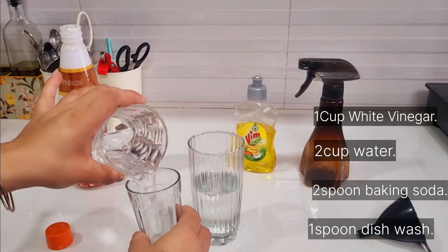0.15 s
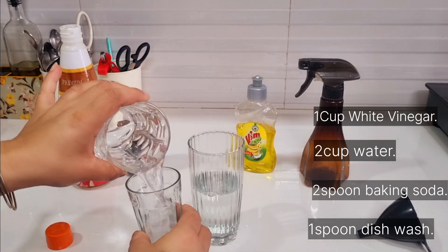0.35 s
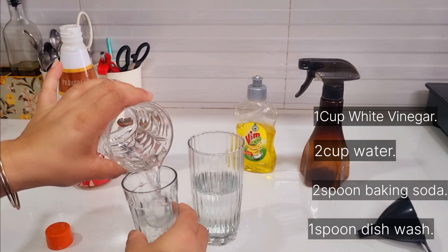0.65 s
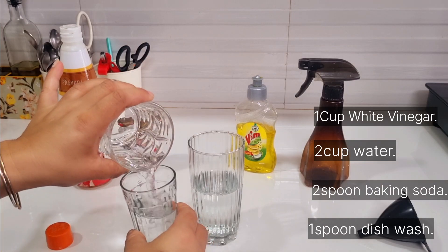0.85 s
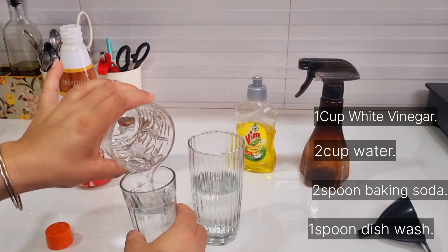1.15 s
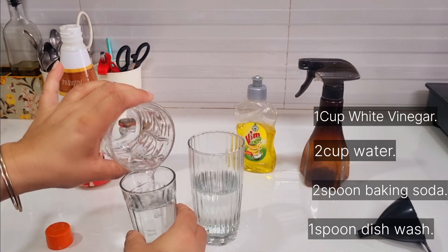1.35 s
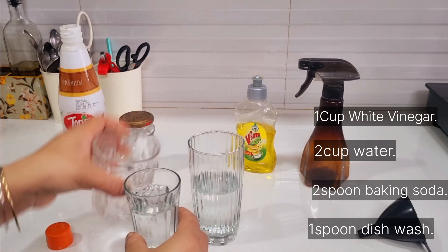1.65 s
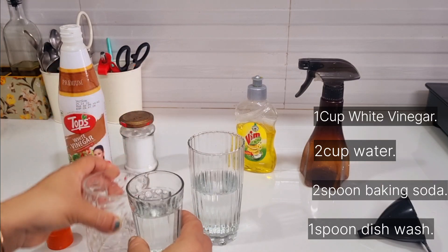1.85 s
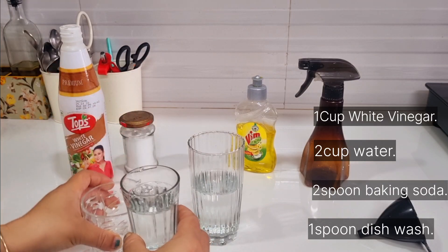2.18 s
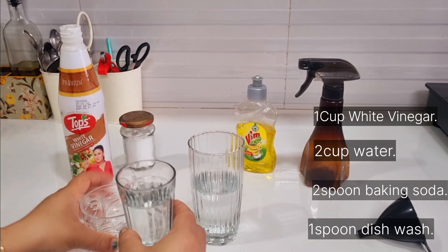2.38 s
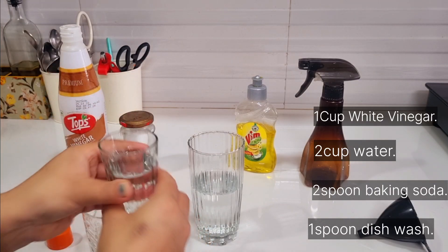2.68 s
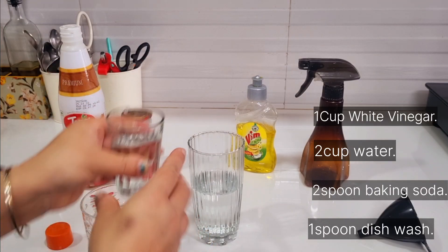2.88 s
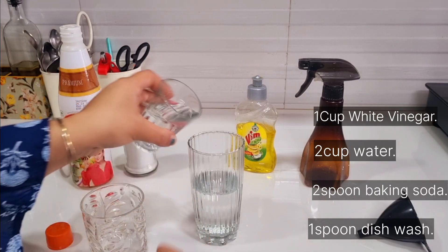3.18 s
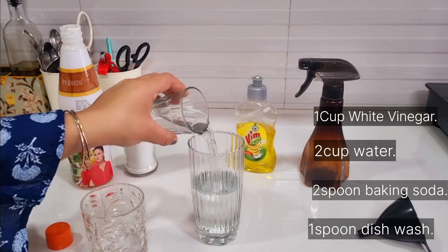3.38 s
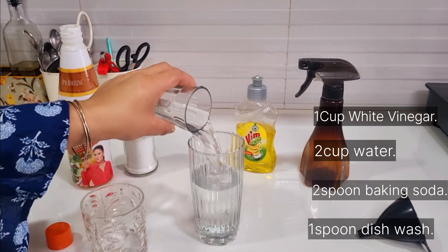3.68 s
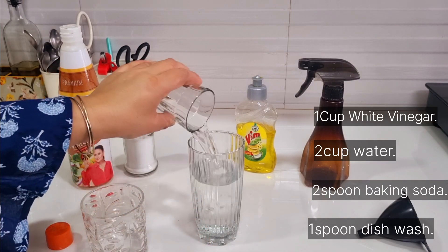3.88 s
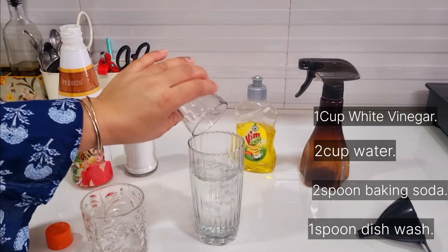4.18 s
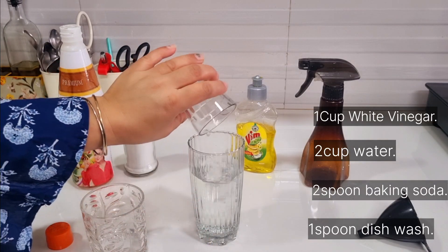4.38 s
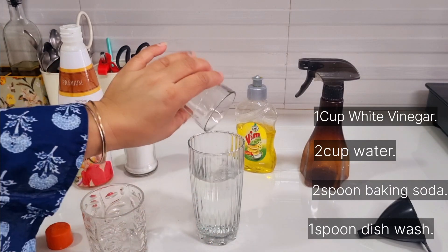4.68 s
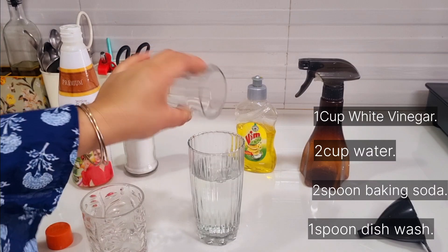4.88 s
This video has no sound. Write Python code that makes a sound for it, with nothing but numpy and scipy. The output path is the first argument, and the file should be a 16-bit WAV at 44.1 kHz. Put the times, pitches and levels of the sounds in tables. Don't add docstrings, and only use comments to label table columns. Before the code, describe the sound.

Close bubbly pouring between glasses with glassy ticks, a hard clink on a stone counter, faint bangle jingle, another pour and low fridge hum.

```python
import sys
import numpy as np
from scipy import signal
from scipy.fft import rfft, irfft, next_fast_len
from scipy.io import wavfile

SR = 44100
rng = np.random.default_rng(int(sys.argv[2]) if len(sys.argv) > 2 else 0)


def log_audio(samples):
    frames = np.atleast_2d(samples).T
    limited = np.clip(frames, -1, 1)
    pcm = np.round(limited * 32767).astype(np.int16)
    wavfile.write(sys.argv[1], SR, pcm)


def gain_from_db(level_db):
    decades = np.asarray(level_db, float) / 20
    return 10 ** decades


N = 222374


def rms_one(x):
    return x / np.sqrt(np.mean(x ** 2) + 1e-20)


def at_hz(points, hz):
    table = np.array(points)
    return np.interp(np.log(np.maximum(hz, 1)), np.log(table[:, 0]), table[:, 1])


def drift(rate):
    r = np.exp(-80 * np.pi * rate / SR)
    white = rng.standard_normal(N // 40 + 2002)
    slow = signal.lfilter([1], [1, -2 * r, r * r], white)[2000:]
    return np.interp(np.arange(N) / 40, np.arange(len(slow)), rms_one(slow))


def coloured(white, spectrum):
    size = next_fast_len(N)
    gain = gain_from_db(at_hz(spectrum, np.fft.rfftfreq(size, 1 / SR)))
    return rms_one(irfft(rfft(white, size) * gain, size)[..., :N])


def diffuse(length):
    # (frequency [Hz], correlation [-1..1])
    likeness = [(60, 0.95), (130, 0.92), (290, 0.89), (640, 0.15), (1410, -0.23), (3100, 0.01),
                (6820, -0.09), (15000, -0.18)]
    alike = np.clip(at_hz(likeness, np.fft.rfftfreq(length, 1 / SR)), -1, 1)
    mid, side = rfft(rng.standard_normal((2, length)))
    return (np.sqrt(1 + alike) * mid + np.sqrt(1 - alike) * side * [[1], [-1]]) / np.sqrt(2)


def room_noise():
    # (frequency [Hz], level [dB per Hz])
    noise_colour = [(25, -20), (50, -5), (72, -9.5), (95, 0.5), (135, -11), (245, -9),
                    (332, -6.5), (381, -12.5), (700, -20.5), (1060, -25), (2880, -29.5), (5760, -37.5),
             (8000, -35), (10300, -49)]
    # (frequency [Hz], left over right [dB])
    left_more = [(60, 2), (180, 4.5), (550, 2.5), (1650, 3), (4970, 1.5), (15000, -12.5)]
    size = next_fast_len(N)
    hz = np.fft.rfftfreq(size, 1 / SR)
    sides = gain_from_db(at_hz(left_more, hz) * np.array([[.5], [-.5]]))
    spectra = diffuse(size) * sides * gain_from_db(at_hz(noise_colour, hz))
    return gain_from_db(-49.5) * rms_one(irfft(spectra, size)[:, :N])


def fridge_hum():
    # (frequency [Hz], level [dB rms])
    lines = [(147.3, -50.5), (196.6, -55), (324.5, -58)]
    t, hum = np.arange(N) / SR, np.zeros(N)
    for hz, db in lines:
        level = gain_from_db(db + 1.03 * drift(3)) * np.sqrt(2)
        hum += level * np.sin(2 * np.pi * (hz * t + 0.022 * drift(1.5) + rng.random()))
    return hum


def rustle():
    # (time [s], peak [dB], half-width at 10 dB down [s])
    moves = [(.35, -55, 0.23), (1.5, -61.5, 0.6), (2.27, -53, -0.25), (2.75, -61.5, .5), (3.65, -62, .25),
             (4.05, -63, 0.6), (4.53, -51.5, 0.28), (4.95, -61, 0.7)]
    t = np.arange(N) / SR
    moves_db = np.max([db - 10 * ((t - s) / width) ** 2 for s, db, width in moves], axis=0)
    cloth = coloured(rng.standard_normal((2, N)), [(3000, -39), (8000, -11), (12000, 0.0), (15500, 1.2)])
    return gain_from_db(moves_db - 6.5) * cloth


def room_tail():
    # (frequency [Hz], t60 [s])
    kitchen_t60 = [(100, 1), (500, 0.33), (2000, 0.37), (5000, 0.5), (9000, 0.24), (16000, 0.13)]
    length = 2 ** 15
    age, hz = np.arange(length) / SR, np.fft.rfftfreq(length, 1 / SR)
    noise, tail = diffuse(length), 0
    for centre in 62.5 * 2 ** np.arange(9):
        share = np.clip(1 - np.abs(np.log2(np.maximum(hz, 62.5) / centre)), 0, 1)
        band = irfft(noise * share, length)
        tail = tail + band * gain_from_db(-60 * age / at_hz(kitchen_t60, centre))
    tail *= np.clip((age - .002) / 0.00089, 0, 1)
    return tail / np.sqrt(np.sum(tail ** 2) / 2)


def late_right(x, count):
    return np.stack([x[0], np.roll(x[1], count)])


def ring(clicks, hz, t60):
    r, w = gain_from_db(-60 / (t60 * SR)), 2 * np.pi * hz / SR
    return signal.lfilter([0, np.sin(w)], [1, -2 * r * np.cos(w), r * r], clicks + 1e-18)


def struck(blows, modes):
    out, at = np.zeros(N), [round(s * SR) for s, db in blows]
    later = np.arange(len(at)) > 0
    for k, (hz, level_db, t60) in enumerate(modes):
        clicks = np.zeros(N)
        uneven_db = 3 * rng.standard_normal(len(at)) * later
        clicks[at] = gain_from_db(np.array(blows)[:, 1] + level_db + uneven_db)
        out += ring(clicks, hz, t60) * (-1) ** k
    return np.tile(out, (2, 1))


def counter_thud():
    # (frequency [Hz], level [dB], t60 [s])
    blow = [(2.205, -26)]
    slab = [(102, -18, 0.2), (124, -7, 0.4049), (218, -7, 0.14), (382, -12, 0.084)]
    return struck(blow, slab)


def full_glass_nudge():
    # (frequency [Hz], level [dB], t60 [s])
    touches = [
        (1.376, -60.5),
        (1.395, -53.5),
    ]
    full_glass = [(2420, -6, .12), (3020, -3, 0.4), (5370, -3.5, 0.073)]
    return struck(touches, full_glass)


def bangles():
    # (frequency [Hz], level [dB], t60 [s])
    knocks = [
        (2.515, -57),
        (2.5235, -43),
        (2.546, -48),
        (2.866, -49),
    ]
    metal = [(5000, -5.5, 0.014), (5580, -6, 0.016), (7650, -2, 0.025), (8350, 2, 0.043),
             (9080, -1.5, 0.045), (11100, -8, 0.013), (12070, 3, 0.05), (13080, 2, 0.066),
             (15100, -5.5, .03)]
    return struck(knocks, metal)


def rim_tick():
    # (frequency [Hz], level [dB], t60 [s])
    tick = [(.2098, -31.5)]
    rim_modes = [(3370, -14, 0.0464), (4450, -16, 0.036), (5280, 5.5, 0.025), (5875, 6, 0.017),
                 (7750, -8, .03), (9930, -8, 0.095), (10600, -6, .03), (13140, -10, 0.029),
                 (15100, 1.5, 0.024)]
    return struck(tick, rim_modes)


def glass_knocks():
    # (time [s], peak [dB])
    bounces = [
        (2.1823, -13.5),
        (2.2005, -24.5),
        (2.215, -29),
        (2.236, -36),
    ]
    tap = [(.664, -31)]
    # (frequency [Hz], level [dB], t60 [s])
    tumbler = [(575, -29, 0.017), (1006, 2, 0.03), (1120, 3.5, 0.012), (1450, 0, 0.007972),
               (1650, -6.5, 0.015), (1980, -5, 0.011), (2213, -1, .04), (2290, 0.5, 0.022),
               (2350, -13.5, 0.22), (2490, -5, 0.013), (3499, -3, 0.0047), (4550, -3, 0.0049),
               (5510, -5, 0.0062), (8000, -11.5, 0.0011)]
    filling_glass = [(522, -4, 0.023), (2137, -2, 0.068), (3213, -7, 0.036), (5000, -4, 0.047),
                     (5400, -5, 0.0217), (4200, -21, 0.016), (7400, -9, 0.025), (9140, -11.5, 0.047),
                     (12800, -26, .04)]
    return struck(bounces, tumbler) + struck(tap, filling_glass)


def add(out, s, piece, pan_db, echo_db):
    at, pan_db = round(s * SR), np.clip(pan_db, -8, 8)
    gains = gain_from_db(np.array([[pan_db / 2], [-pan_db / 2], [echo_db]]))
    out[:, at:at + len(piece)] += piece[:N - at] * gains


def ticks(rows, pan_db, echo_db):
    out, age = np.zeros((3, N)), np.arange(400) / SR
    for (s, peak_db, hz, octaves), white in zip(rows, rng.standard_normal((len(rows), 400))):
        edges = np.clip(hz * 2 ** (np.array([-.5, .5]) * max(octaves, .3)), 100, .45 * SR)
        band = signal.butter(2, edges, "band", fs=SR, output="sos")
        piece = signal.sosfilt(band, white * np.exp(-age / 0.0014))
        add(out, s, gain_from_db(peak_db + 2.5) * piece / np.abs(piece).max(), pan_db, echo_db)
    return out


def drops_and_fingers():
    # (time [s], peak [dB], centre [Hz], width [octaves])
    tick_rows = [(.1252, -38, 7000, 2.3), (.2086, -28.5, 7000, 2.5), (.4985, -36, 9000, 2.5),
                 (.5935, -47, 8900, 0.99), (.6628, -34, 2510, 2.1), (.7044, -40, 9000, 2),
                 (.758, -44, 9000, 1.5), (.8777, -53, 8000, 1.6), (1.4752, -48, 686.4, 1),
                 (1.4953, -46.5, 800, 5), (1.5209, -55, 5000, 1.2), (1.6203, -49, 6950, 2.234),
                 (2.867, -48, 11100, 1.17), (3.4323, -51, 5000, 4.195)]
    close_rows = [(.35, -35, 895, 1.5), (.441, -38.5, 1180, 1.4), (.548, -45.5, 1500, 1.1),
                  (.663, -32.5, 780, 2.1), (4.036, -46, 1870, 1.3), (3.478, -40, 3370, 0.24),
                  (4.162, -37, 2180, 3.3), (4.56, -47.5, 3640, 0.27), (4.9177, -46, 11000, 2.137),
                  (4.94, -31, 13300, .71), (4.9638, -42.5, 3440, 2.3)]
    crack = [(2.1823, -40, 11100, 1.4)]
    out = ticks(tick_rows, pan_db=1.5, echo_db=3.5)
    out += ticks(close_rows, pan_db=14, echo_db=-6)
    return out + ticks(crack, pan_db=0, echo_db=15.5)


def with_brood(rows, count=3):
    spread_s, level_db, spread_octaves = .03, -9, 0.157
    brood = []
    for (s, db, hz), kin in zip(rows, rng.random((len(rows), count, 3))):
        for a, b, c in kin:
            if s + spread_s < N / SR:
                pitch = hz * 2 ** (spread_octaves * (2 * c - 1))
                brood.append((s + spread_s * a, db + level_db - 6 * b, pitch))
    return rows + brood


def bubbles(rows, echo_db, rise=0.034):
    out = np.zeros((3, N))
    for (s, peak_db, hz), place in zip(rows, rng.standard_normal(len(rows))):
        t60 = 0.048 * (hz / 1000) ** -0.46
        age = np.arange(round(t60 * SR)) / SR / t60
        phase = 2 * np.pi * hz * t60 * (age + rise * (2 * age ** 2 - age))
        swell = np.sin(np.pi / 2 * np.minimum(age * t60 * hz / 3.5, 1)) ** 2
        piece = gain_from_db(peak_db - 60 * age) * swell * np.sin(phase)
        add(out, s - 1.5 / hz, piece, 7.5 * place, echo_db)
    return out


def pour_bubbles():
    # (time [s], peak [dB], pitch [Hz])
    glugs = [(.314, -41, 950), (.323, -35.5, 1463), (.344, -33.5, 940), (.35, -30, 698),
             (.361, -44, 770), (.371, -36, 956), (.4, -33.5, 1530), (.416, -33, 947),
             (.441, -34.5, 945), (.448, -54, 900), (.462, -33.5, 1410), (.499, -41, 1515),
             (.526, -35, 1556), (.527, -42.5, 995), (.549, -42, 1450), (.577, -56, 1400),
             (.691, -41, 2100), (.703, -38, 1650), (.726, -38, 2100), (.747, -36.5, 1825),
             (.767, -52, 1810), (.814, -48, 2220), (.858, -46, 1840), (.896, -45.5, 1805),
             (1.476, -44, 428), (1.495, -50, 472),
             (3.434, -32.5, 480), (3.444, -43, 1160), (3.459, -41, 450), (3.472, -41.5, 1283),
                   (3.531, -32.5, 1180), (3.5557, -39.5, 1186), (3.699, -48, 1470), (3.713, -48, 1390),
                   (3.7888, -48, 1050), (3.833, -48, 1720), (3.9865, -41.5, 1670), (4.0374, -42.5, 1950),
                   (4.047, -42, 1656), (4.061, -46, 1650), (4.0744, -45, 1440), (4.161, -46.5, 400),
                   (4.1615, -41.5, 764), (4.1619, -45, 2810), (4.1633, -54, 4360), (4.962, -43, 402.6),
                   (5.027, -54, 2180),
             (0.3346, -41.5, 2570), (.3544, -42, 2440), (.4044, -45, 2190), (.5482, -42, 2090),
                (.564, -46, 2340), (3.744, -50, 4450), (3.765, -57, 5170), (3.54, -37, 1120),
                (3.6, -61, 1140)]
    pings = [(.1285, -37, 3570), (.1494, -50, 3770), (0.3462, -36.5, 5520), (.3694, -43, 3610),
             (.8799, -46, 4510), (0.8954, -49.5, 4050), (1.1749, -50.5, 7250), (1.289, -50.5, 13000),
             (3.4444, -49, 6160), (3.4666, -38.5, 8800), (1.6197, -60, 11000), (3.4814, -46, 5171),
             (3.4994, -45, 3490), (3.515, -38, 13400), (4.012, -52, 14500), (3.5531, -42, 4680),
             (3.608, -48.5, 3250), (3.6248, -50.5, 6280), (3.7363, -49.5, 5040), (3.7594, -49, 4780),
             (3.8426, -54, 5100), (3.8427, -49.5, 6840), (3.9929, -44, 5040), (4.0144, -50, 4960),
             (4.0663, -43, 6240), (4.0893, -40.5, 6080), (4.1116, -45, 6800)]
    large = bubbles(with_brood(glugs), echo_db=-1)
    return large + bubbles(with_brood(pings), echo_db=0.5)


def grains(per_s, spread_db):
    sizes = gain_from_db(spread_db * np.minimum(rng.exponential(1, N), 5)) * rng.choice([-1, 1], N)
    return sizes * (rng.random(N) < per_s * gain_from_db(4 * drift(15)) / SR)


def swarm(born, pitches, cycles, centre_hz, narrow_db):
    dealt, out = rng.integers(0, len(pitches), N), np.zeros(N)
    for k, hz in enumerate(pitches):
        share = gain_from_db(-narrow_db * np.log2(hz / centre_hz) ** 2)
        out += ring(born * (dealt == k) * share, hz, cycles / hz)
    return out


def surge_db(rows, peaks_db, fall_db_per_s):
    start, hold = rows[:, 0, None], rows[:, 1, None]
    age = np.arange(N) / SR - start
    slope = np.minimum(3000 * age, fall_db_per_s * (hold - age))
    return peaks_db[:, None] + np.minimum(0, slope)


def streams():
    # (start [s], hold [s], fizz [dB], gurgle [dB], pitch of the air in the glass [Hz])
    surges = [(0.129, 0.096, -48.5, -78, 1390), (.318, 0.04, -44.5, -47, 1270),
              (0.444, 0.14, -58.5, -55, 1500), (0.663, 0.0056, -45, -39.5, 2080),
              (.79, 0.1, -65.5, -62, 1800), (2.519, 0.01, -56.5, -53.5, 910),
              (3.434, 0.072, -51.5, -53.5, 1240), (3.535, 0.02458, -67.5, -54, 1414),
              (3.717, 0.13, -64.5, -61.5, 1386), (3.985, 0.096, -56, -55, 1600),
              (4.156, 0.1, -66, -58.5, 1080), (4.433, 0.16, -62, -63, 1370), (5.0, .05, -63, -54.5, 2390)]
    # (frequency [Hz], level [dB per Hz])
    crackle_colour = [(1500, -41), (2500, -9), (3500, -5), (5500, -7.5), (7500, 5), (9000, -1.5),
                      (13000, -6), (15500, -0.5)]
    rows = np.array(surges)
    fizz_db = surge_db(rows, rows[:, 2], 131).max(0)
    gurgles_db = surge_db(rows, rows[:, 3], 203)
    gurgle_db, pitch_hz = gurgles_db.max(0), rows[gurgles_db.argmax(0), 4]
    crackle = coloured(grains(5000, 3.3), crackle_colour)
    tiny = rms_one(swarm(grains(900, 2.6), np.geomspace(2600, 14000, 20), 30, 5500, narrow_db=4))
    fizz = (crackle + 0.65 * tiny) * gain_from_db(fizz_db - 3.5 + 4.4 * drift(24.56))
    air_hz = np.maximum(pitch_hz, 900)
    gurgle = rms_one(swarm(grains(800, 2.5), np.geomspace(550, 3200, 24), 20, air_hz, narrow_db=12))
    return fizz + gurgle * gain_from_db(gurgle_db - 2.0)


def scene():
    background = room_noise() + fridge_hum() + rustle()
    wrist, rim, glass = bangles(), rim_tick(), glass_knocks()
    small = drops_and_fingers() + pour_bubbles()
    flow = streams()
    solids = gain_from_db(3.5) * glass + gain_from_db(-6) * rim + gain_from_db(-2) * wrist
    sent = small[2] + gain_from_db(-3) * flow + solids[0]
    echo = signal.fftconvolve(sent[None], room_tail(), axes=1)[:, :N]
    direct = small[:2] + glass + rim + counter_thud() + full_glass_nudge()
    return direct + late_right(wrist + flow, count=20) + echo + background


def low_pass(x):
    return signal.sosfilt(signal.butter(12, 16970, fs=SR, output="sos"), x)


def record(dry):
    cut = signal.sosfilt(signal.butter(2, 45, "high", fs=SR, output="sos"), dry)
    cut = signal.sosfilt(signal.cheby2(14, 50, 16250, fs=SR, output="sos"), cut)
    return low_pass(cut)


dry = scene()
out = record(dry)
log_audio(out)
```